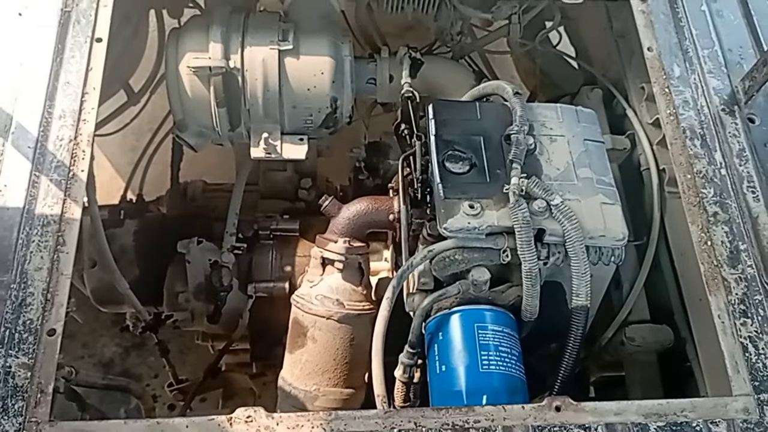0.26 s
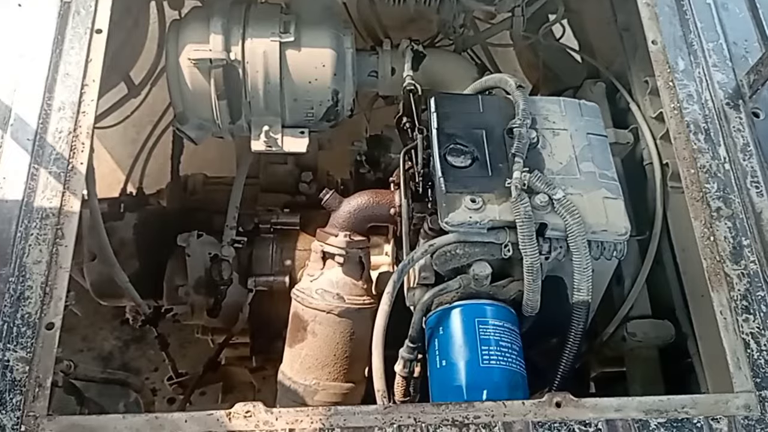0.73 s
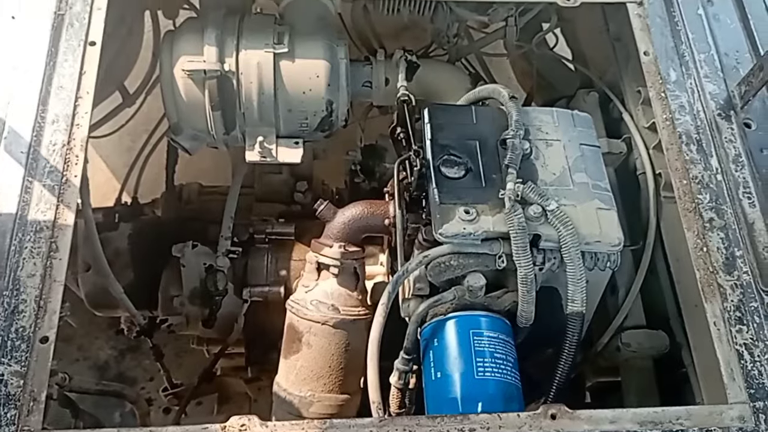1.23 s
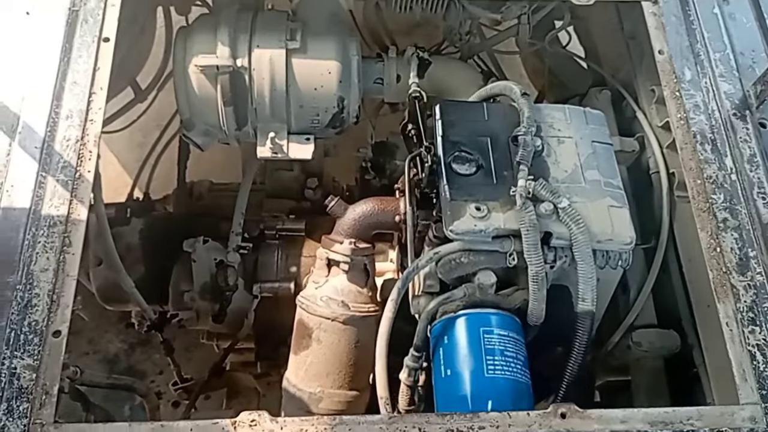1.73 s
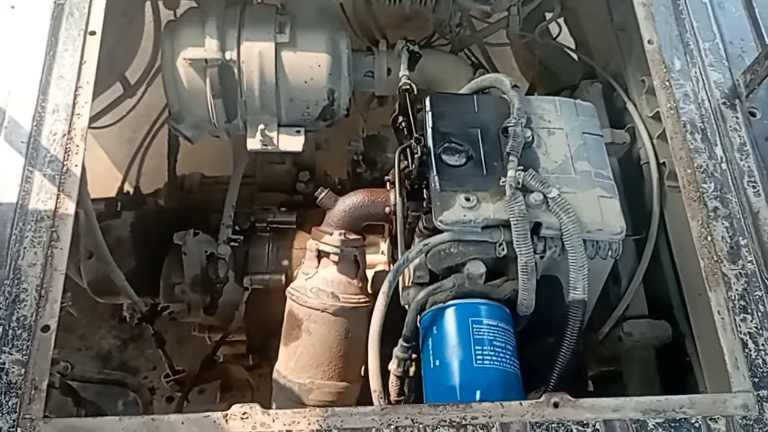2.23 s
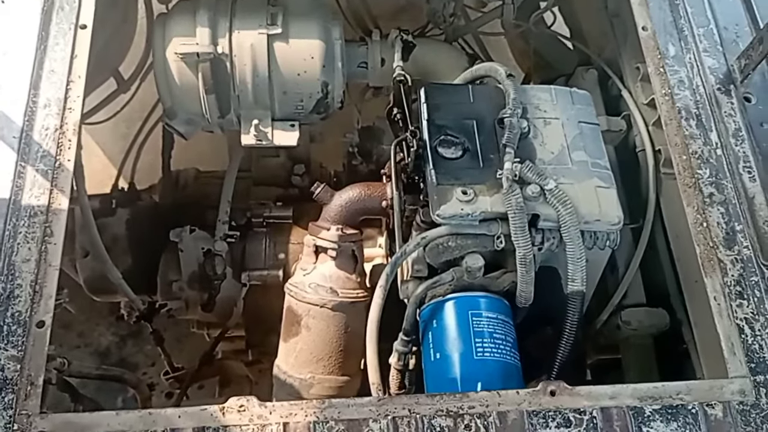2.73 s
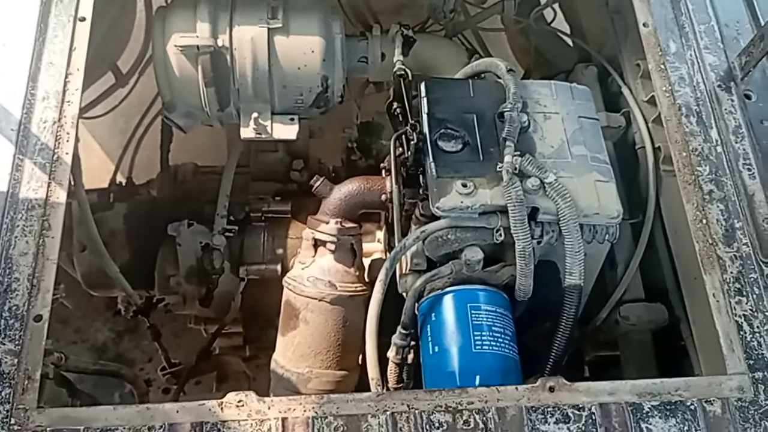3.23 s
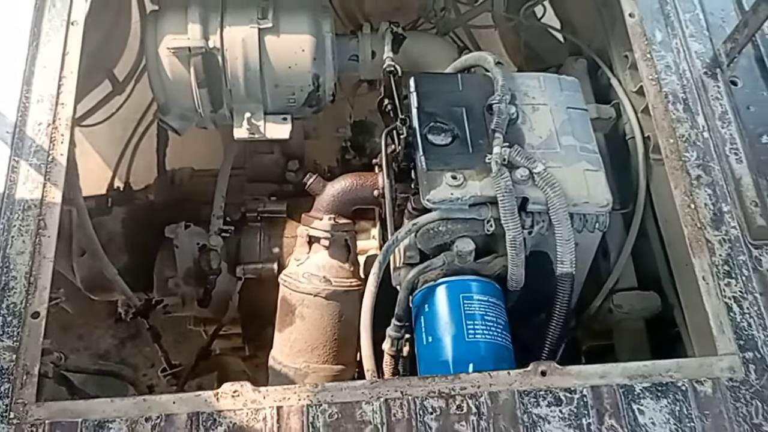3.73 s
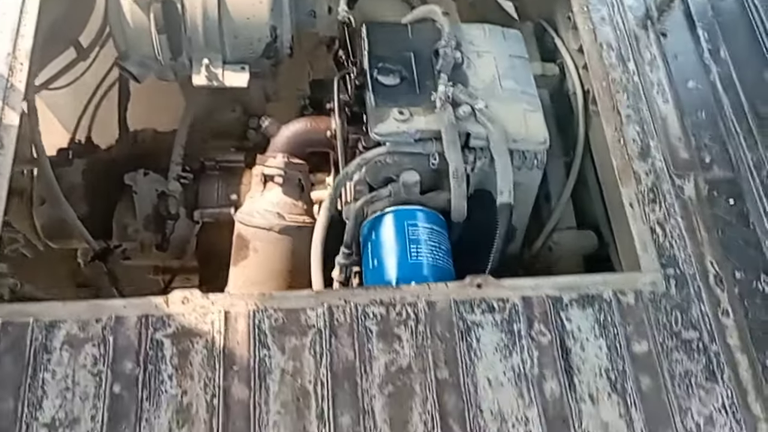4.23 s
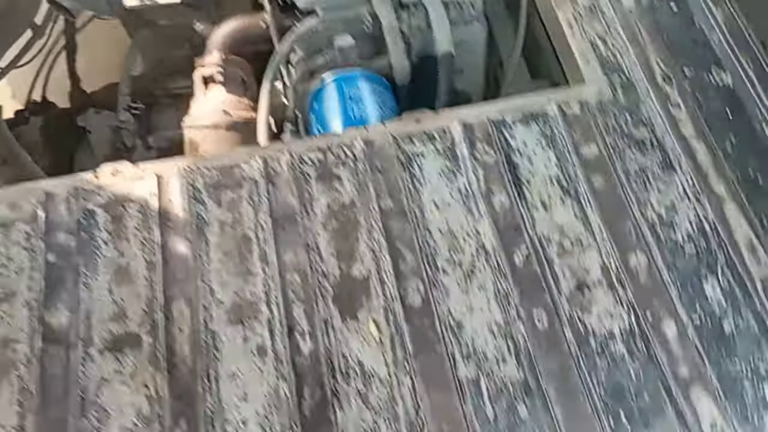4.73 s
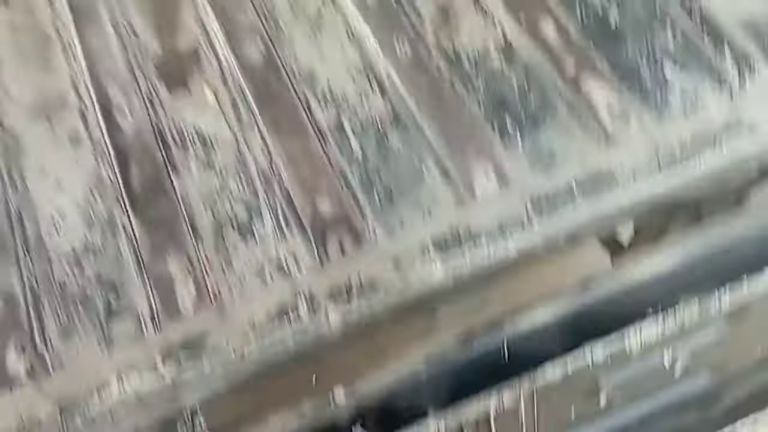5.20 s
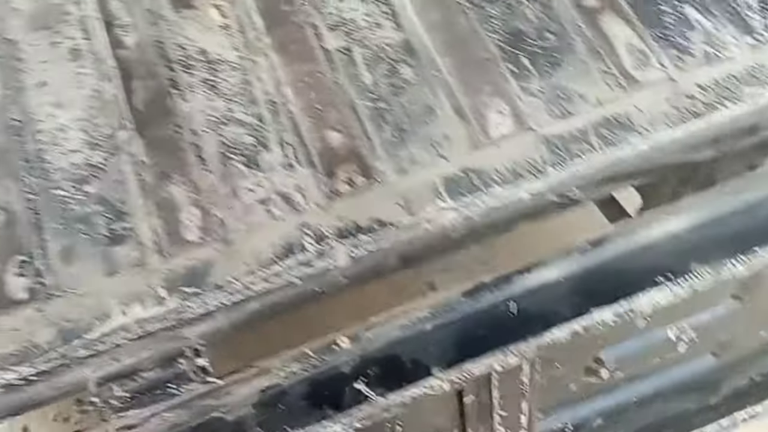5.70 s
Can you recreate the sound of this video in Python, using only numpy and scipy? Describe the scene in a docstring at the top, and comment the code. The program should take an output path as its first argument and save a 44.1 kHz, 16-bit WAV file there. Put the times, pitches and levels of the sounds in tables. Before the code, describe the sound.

Close by an open engine bay outdoors, hissing starter gears give way to uneven thumps, a fast rattling rev and a steady knocking idle.

```python
"""At the open engine hatch of a three-wheeler, its single-cylinder engine starts over a faint outdoor rumble.
The starter hums and whines while its gear teeth, as shaped noise, hiss on the flywheel.
The engine catches, races briefly and settles to idle. Blows in each four-stroke cycle excite filtered noise
or damped resonances: valve clatter, combustion knock, exhaust thump, a second valve and an intake gulp."""
import sys
import numpy as np
from scipy import signal
from scipy.fft import rfft, irfft, next_fast_len
from scipy.io import wavfile
from scipy.ndimage import map_coordinates

SR = 44100
rng = np.random.default_rng(int(sys.argv[2]) if len(sys.argv) > 2 else 0)


def materialize(psi):
    """Save the field psi as 16-bit PCM at rate SR to the path in sys.argv[1].

    A 1-D psi becomes a single channel; in a 2-D psi each row is a channel.
    """
    bounded = np.clip(np.atleast_2d(psi).T, -1, 1)
    quanta = np.round(bounded * 32767).astype(np.int16)
    wavfile.write(sys.argv[1], SR, quanta)


N = 262687
TIME = np.arange(N) / SR  # s


def amp(db):
    """Decibel law: level to amplitude ratio."""
    return 10 ** (np.asarray(db) / 20)


def unit(x):
    """Power normalization: x at rms 1."""
    return x / np.sqrt(np.mean(x ** 2) + 1e-20)


def along(points, hz):
    """Logarithmic frequency scale: (Hz, value) points joined by straight lines on it."""
    f, v = np.transpose(points)
    return np.interp(np.log(hz + 1), np.log(f + 1), v)


def curves(rows, at=TIME):
    """Linear interpolation: each column after the time, read at the given moments."""
    s, *columns = np.transpose(rows)
    return [np.interp(at, s, column) for column in columns]


def wobble(rate):
    """Random modulation: a smooth curve with rate knots a second."""
    knots = rng.standard_normal(int(N * rate / SR) + 4)
    return map_coordinates(knots, [TIME * rate])


def filtered(x, response):
    """Linear filtering: the spectrum of x times a complex response of frequency."""
    m = next_fast_len(N + SR // 2)
    return irfft(rfft(x, m) * response(np.fft.rfftfreq(m, 1 / SR)), m)[..., :N]


def low_pass(hz, corner_hz):
    """Spectral roll-off: gain falls steeply above the corner."""
    return 1 / (1 + (hz / corner_hz) ** 4)


def high_pass(hz, corner_hz):
    """Spectral roll-off: gain falls steeply below the corner."""
    return 1 / (1 + (corner_hz / (hz + 1)) ** 4)


# stereo width of every noise wash: freq_hz [Hz], side_over_mid_db [dB]
STEREO_WIDTH = [(60, -34), (110, -22), (200, -13.5), (380, -9.5), (700, -8), (1290, -1.5), (2380, -2.5),
                (4400, 0.5), (8120, 1), (15000, -0.5)]


def ringing(spectrum, modes=(), width_hz=40, ripple_db=0):
    """Modal superposition: a stereo noise wash of rms 1, a broad spectrum with its modes standing out."""
    def colour(hz):
        """Resonance curves: mode lifts, each held to 7 dB, on a rippled spectrum."""
        lift_db = sum(np.minimum(db, 7) / (1 + (2 * (hz - f) / width_hz) ** 2) for f, db in modes)
        # countless weaker modes ripple the spectrum, differently in mid and side
        knots = np.arange(0, SR / 2, 24)
        ripple = np.array([np.interp(hz, knots, row) for row in rng.uniform(-1, 1, (2, len(knots)))])
        widths = np.array([np.ones_like(hz), amp(along(STEREO_WIDTH, hz))])
        return amp(along(spectrum, hz) + lift_db + ripple_db * ripple) * widths
    mid, side = filtered(rng.standard_normal((2, N)), colour)
    return unit(np.array([mid + side, mid - side]))


def shifting(spectrum, modes, width_hz, ripple_db, rate):
    """Moving contact point: two washes mix so that the fine colour changes about rate times a second."""
    angle = wobble(rate)
    one, other = (ringing(spectrum, modes, width_hz, ripple_db) for _ in range(2))
    return np.cos(angle + np.pi / 4) * one + np.sin(angle + np.pi / 4) * other


def handover(before, after, span):
    """Equal-power crossfade: one sound gives way to another over a span of seconds."""
    share = np.interp(TIME, span, [0, 1])
    return np.sqrt(1 - share) * before + np.sqrt(share) * after


def shaken(blows, rise_s, fall_s):
    """Exponential build-up and decay: amplitude of a part's rattle after each blow."""
    t = np.arange(SR // 4) / SR
    shape = (1 - np.exp(-t / rise_s)) * np.exp(-t / fall_s)
    return np.abs(signal.fftconvolve(blows, shape / shape.max())[:N])


def struck(blows, modes):
    """Impulse response of damped resonances; a unit blow has the energy of a tenth of a second at rms 1."""
    hz = np.fft.rfftfreq(SR // 2, 1 / SR)
    response = sum((-1) ** k * amp(db) * 1j * hz * w / (f * f - hz * hz + 1j * hz * w)
                   for k, (f, w, db) in enumerate(modes))
    ring = irfft(response)
    return signal.fftconvolve(blows, ring / np.linalg.norm(ring) * np.sqrt(SR / 10))[:N]


def blows_at(rows):
    """Impulsive excitation: one impulse for each (s, level dB) row."""
    when, db = np.transpose(rows)
    return np.bincount((when * SR).astype(int), amp(db), N)


# the engine once it has caught: start_s [s], firing_rate [firings per second]
SPEED = [(2.098, 9.29), (2.418, 12.31), (2.716, 16.7), (3.024, 18.43), (3.843, 12.49), (4.376, 11.09),
         (5.64, 9.83), (5.9, 10.12)]
# the slow first firings: start_s [s], strength_db [dB]
FIRST_FIRINGS = [(1.121, -1.5), (1.401, -7), (1.643, 2), (1.819, 1), (1.976, 0.5)]


def cycles():
    """Phase integration of speed: start and length of each cycle, a few slow ones, then one per camshaft turn."""
    caught = TIME[TIME >= SPEED[0][0]]
    turns = np.cumsum(curves(SPEED, caught)[0]) / SR
    steady = np.interp(np.arange(turns[-1]), turns, caught)
    start = np.append(np.transpose(FIRST_FIRINGS)[0], steady)
    return start, np.append(np.diff(start), start[-1] - start[-2])


# open for the start, then eased back: start_s [s], throttle [0-1]
THROTTLE = [(2.2, 0.95), (2.8, 1), (3.1, 1), (3.6, 0.39)]
# the floor comes between engine and microphone: start_s [s], screening [0-1]
SCREENING = [(3.9, 0.09), (5.8, 0.98)]
REFERENCE_RATE = 10  # firings a second


def loudness(law, at=TIME):
    """Source strength law: a part's level in dB from speed, throttle and screening."""
    base_db, speed_db, throttle_db, screened_db, _ = law
    doublings = np.log2(curves(SPEED, at)[0] / REFERENCE_RATE)
    engine_db = base_db + speed_db * doublings + throttle_db * curves(THROTTLE, at)[0]
    return engine_db + screened_db * curves(SCREENING, at)[0]


def beats(law):
    """Cycle-to-cycle variation: start and level in dB of a part's stroke, with the law's random scatter."""
    start = cycles()[0]
    first_db = np.pad(np.transpose(FIRST_FIRINGS)[1], (0, len(start) - len(FIRST_FIRINGS)))
    return start, loudness(law, start) + first_db + law[-1] * rng.standard_normal(len(start))


def strokes(share, db, scatter_s=0):
    """Periodic excitation: one impulse in each engine cycle, at a share of its length."""
    start, length = cycles()
    when = start + share * length + scatter_s * rng.standard_normal(len(start))
    samples = np.maximum(when * SR, 0).astype(int)
    return np.bincount(samples, amp(db) * np.ones(len(start)), N)[:N]


def cluster(share, db, spread_s, fall_s, count):
    """Energy summation: a few hard clicks follow each stroke, each at its own moment and strength."""
    length = cycles()[1]
    power = 0
    for _ in range(count):
        delay = rng.exponential(spread_s, len(db)) / length
        power = power + strokes(share + delay, db + rng.uniform(-3, 2, len(db))) ** 2
    return np.sqrt(shaken(power, rise_s=0.0002, fall_s=fall_s / 2))  # halved: power falls twice as fast


def running():
    """Gradual onset: fades the engine's steady churn in as it catches."""
    return np.interp(TIME, [1.1, 2.05], [0, 1]) ** 2


# firings that hit harder or softer: start_s [s], knock_lift_db [dB], valve_lift_db [dB]
ACCENTS = [(2.1, 1, 4.5), (2.2, 1, -1), (2.29, -1, -1.5), (2.38, -3, 1), (2.46, 1.5, 0.5), (2.535, -2, 0),
           (2.61, 1, .5), (2.73, -.5, 0), (2.79, 1.5, 2), (3.13, -0.5, -1.5), (3.19, 0, -2),
           (3.3, -0.5, 0.5), (3.49, -2.5, .5), (3.55, 0, 1), (4.02, 1, -0.5), (4.1, 2, 0), (4.19, 0.5, -.5),
           (4.36, 0.5, -0.5), (4.64, 0.5, .5), (4.82, 1, 0.5), (4.92, -0.5, 1), (5.01, 0, 0.5),
           (5.11, -0.5, 0), (5.21, -2, 0.5), (5.3, 2, -0.5), (5.4, 0, -0.5), (5.5, -.5, 0.5),
           (5.6, 1.5, -1), (5.81, 1.5, 1), (5.9, 1.5, 2)]


def accents(start):
    """Uneven excitation: lift in dB of the knock and of the valves in each cycle."""
    s, *lifts = np.transpose(ACCENTS)
    return np.array(lifts) @ (np.abs(start - s[:, None]) < 0.025)


# faint outdoor rumble: freq_hz [Hz], density_db [dB per Hz, relative]
AIR = [(20, -4), (60, -5), (130, 0), (300, -3), (1000, -16), (5000, -32), (15000, -38)]


def outdoor_rumble():
    """Broadband ambience: steady noise weighted towards the bass."""
    return amp(-49) * ringing(AIR)


# the body shaken through the engine mounts: freq_hz [Hz], density_db [dB per Hz, relative]
MOUNTS = [(25, -29), (50, -9), (75, 4.5), (125, -11), (170, 3), (240, -6), (320, 6.5), (450, -17),
          (1200, -75)]
# gas flow and lurches, before each stroke's trim: base_db [dB at the reference rate, throttle 0],
# speed_db [dB per doubling], throttle_db [dB at full], screened_db [dB], scatter_db [dB per cycle]
PIPE_LAW = (-32.5, 0.5, 5, 0, 0)


def lurches():
    """Vibration transmission: the first uneven firings heave the engine on its mounts and shake the body."""
    start, db = beats(PIPE_LAW)
    uneven_db = np.interp(start, [1.2, 1.8, 1.97, 2.12, 2.22, 2.31, 2.55, 2.8], [-7, -2, 2, 1, 0, 2, -3, -44])
    heave = shaken(strokes(0.25, db + uneven_db - 0.5), rise_s=0.011, fall_s=0.065)
    return heave * ringing(MOUNTS)


# where strokes fall in the cycle: start_s [s], then shares of the cycle [0-1]:
# knock_share, exhaust_share, second_valve_share, crankcase_thud_share
TIMING = [(2.1, 0.12, 0.48, 0.51, 0.3), (2.5, 0.13, 0.36, 0.63, .25), (3.0, 0.077, 0.344, 0.6, 0.012),
          (3.6, 0.12, 0.43, 0.71, .16), (4.3, 0.15, 0.452, .74, .22), (5.9, 0.2, 0.45, 0.69, .19)]
# turbulent boom of the silencer: freq_hz [Hz], density_db [dB per Hz, relative]
PIPE = [(16, -49), (28, -35), (86, 3.5), (184, 3.5), (210, 9.5), (270, -41), (460, -120)]
# resonances rung by an exhaust pulse: freq_hz [Hz], width_hz [Hz], level_db [dB, relative]
EXHAUST = [(85.5, 30, -2), (138, 65, -4), (206, 59, -9.5)]
# resonances rung by an intake gulp: freq_hz [Hz], width_hz [Hz], level_db [dB, relative]
INTAKE = [(86, 31, 8), (132.7, 12, 6.5), (173, 49, -0.5)]


def pipes():
    """Pulsating gas flow: an exhaust thump and a softer intake gulp each cycle, over turbulent boom."""
    start, db = beats(PIPE_LAW)
    exhaust_share = curves(TIMING, start)[1]
    slow_db = np.interp(start, [1.9, 2.4], [-8, 0])  # a slow piston moves the gas gently
    load_db = np.interp(start, [3.6, 4.2], [1.5, 0])  # favours the exhaust until idle
    exhaust_db = db + slow_db + load_db - 3.5
    intake_db = db + 2 * slow_db - load_db - 5.5
    exhaust = struck(strokes(exhaust_share, exhaust_db, scatter_s=0.00035), EXHAUST)
    intake = struck(strokes(exhaust_share + 0.356, intake_db, scatter_s=0.00037), INTAKE)
    flow = np.interp(TIME, [1.2, 2.6, 2.9], [0, 0.4, 1])
    boom = flow * amp(loudness(PIPE_LAW) - 3 - 5 * curves(THROTTLE)[0]) * ringing(PIPE)
    # the silencer rounds the pulses off and passes little of their lowest part
    muffled = filtered(exhaust + intake, lambda hz: low_pass(hz, 300) * high_pass(hz, 45))
    return boom + muffled


# panel level, before each stroke's trim: base_db [dB at the reference rate, throttle 0],
# speed_db [dB per doubling], throttle_db [dB at full], screened_db [dB], scatter_db [dB per cycle]
PANEL_LAW = (-27.5, 5, 6.5, -0.6, 0.3)
# drumming, thud and bark over time: start_s [s], bay_force_db [dB], thud_db [dB], bark_db [dB]
DRUMMING = [(2.2, -12, -13, -14), (2.6, -5, -11, -13), (2.85, -.5, -7.5, -10), (3.15, -.5, -10.5, -9),
            (3.5, -4, -10, -8), (4.0, -6.5, -12, -9), (5.0, -3, -14, -12.5)]
# blows with which each cycle drums on the bay: cycle_share [share of the cycle], level_db [dB]
BAY_BLOWS = [(-0.03, -11.5), (0.11, -15), (0.28, -13), (0.42, -14.5)]
# sheet metal of the bay: freq_hz [Hz], width_hz [Hz], level_db [dB, relative]
BAY = [(96, 20, -5), (140, 30, -2.5), (183, 22, 0), (290, 22, 2.5), (340, 55, -3), (424, 55, -1.5),
       (490, 60, -7.5), (585, 70, -9), (668, 50, -12.5)]
# crankcase resonances: freq_hz [Hz], width_hz [Hz], level_db [dB, relative]
CRANKCASE = [(187, 13, -6), (291, 11, 0), (380, 70, -7)]
# valve cover resonances: freq_hz [Hz], width_hz [Hz], level_db [dB, relative]
COVER = [(290, 38, -7), (342, 50, -3.5), (410, 60, -4)]
# sheet metal under throttle: freq_hz [Hz], density_db [dB per Hz, relative]
RACING_PANELS = [(100, -28), (170, -1), (188, -3), (225, -8.5), (254, -10), (275, 4), (291, 5), (317, -2),
                 (424, -1), (455, 1), (521, -9), (565, -22), (620, -4.5), (810, -13), (1360, -120)]
# sheet metal at idle: freq_hz [Hz], density_db [dB per Hz, relative]
IDLE_PANELS = [(100, -38), (170, 2.5), (210, -11), (235, -3), (280, -1.5), (300, -5), (324, -9), (351, -5),
               (424, -3), (470, -14), (507, -5), (547, -16), (620, -12.5), (810, -15), (1360, -120)]


def panels():
    """Structure-borne sound: crankcase thud and valve-cover bark, with the bay's sheet metal drumming along."""
    start, db = beats(PANEL_LAW)
    _, _, second_share, thud_share = curves(TIMING, start)
    force_db, thud_db, bark_db = curves(DRUMMING, start)

    def blow(share, level_db):
        """Impulsive force: one slightly uneven blow a cycle."""
        return strokes(share, level_db + rng.normal(0, 1, len(db)), scatter_s=0.00015)

    thud = struck(blow(thud_share, db + thud_db), CRANKCASE)
    bark = struck(blow(second_share - 0.07, db + bark_db), COVER)
    drum = struck(sum(blow(share, db + force_db + level_db) for share, level_db in BAY_BLOWS), BAY)
    direct = drum + filtered(thud + bark, lambda hz: 1 / (1 + 1j * hz / 800) ** 2)
    # the bay's side wall answers 4.27 ms later, opposite in the two channels
    wall = amp(-13) * filtered(direct, lambda hz: np.exp(-2j * np.pi * hz * 0.00427))
    sheet = handover(ringing(RACING_PANELS), ringing(IDLE_PANELS), [3.3, 4.2])
    throb = shaken(strokes(0.04, db - 10.0), rise_s=0.0065, fall_s=0.024)  # the power stroke shakes the sheets
    churn = running() * amp(loudness(PANEL_LAW) - 4.5)
    rumble = np.hypot(churn, throb) * amp(-8 * curves(THROTTLE)[0])
    return rumble * sheet + np.array([direct + wall, direct - wall])


# the engine begins to overrun the starter, then the pinion drops out
OVERRUN_S, OVERRUN_RISE_S, RELEASE_S, RELEASE_DB_PER_S = 1.378, 0.028, 1.934, 178


def meshed(levels, fall_db_per_s):
    """Load-dependent excitation: level in dB, steady, stepping up when overrun, ringing out on release."""
    cranking_db, more_db = levels
    overrun = np.clip((TIME - OVERRUN_S) / OVERRUN_RISE_S, 0, 1)
    return cranking_db + more_db * overrun - fall_db_per_s * np.maximum(TIME - RELEASE_S, 0)


# the starter motor's hum, before its trim and wobble: start_s [s], level_db [dB]
HUM = [(0.0, -30.5), (0.22, -30.5), (0.288, -41.5), (0.458, -33), (0.518, -53), (0.614, -23), (0.676, -40),
       (0.7, -54), (0.784, -29), (1.198, -30.5), (1.244, -57), (1.274, -32), (1.402, -27), (1.5, -57)]
HUM_HZ, HUM_TRIM_DB = 188.3, 0.8  # centre of a wavering pitch
# the first firings jolt the frame: start_s [s], level_db [dB before filtering]
JOLTS = [(1.186, -39), (1.235, -35), (1.51, -35), (1.553, -36), (1.578, -32), (1.722, -41), (1.862, -35),
         (1.886, -35), (2.009, -30), (2.048, -30), (2.328, -33)]
# what a jolt rings: freq_hz [Hz], width_hz [Hz], level_db [dB, relative]
FRAME_MODES = [(78.4, 22, -1.5), (130, 21, 1), (172, 33, 0), (302, 50, -11)]
# frame shudder: freq_hz [Hz], density_db [dB per Hz, relative]
FRAME = [(30, -30), (60, -8.5), (100, -7), (130, 7), (165, 3.5), (210, 5.5), (300, -38), (600, -70)]


def starter_hum():
    """Tonal motor noise: a wavering sine until the engine outruns it; the frame shudders and is jolted."""
    phase = 2 * np.pi * np.cumsum(HUM_HZ * (1 + 0.016 * wobble(25))) / SR
    loaded = np.interp(TIME, [1.43, 1.55], [1, 0])
    hum_db = curves(HUM)[0] + HUM_TRIM_DB + wobble(24.0)
    hum = loaded * amp(hum_db) * np.sqrt(2) * np.sin(phase)
    jolts = filtered(struck(blows_at(JOLTS), FRAME_MODES), lambda hz: low_pass(hz, 500) * high_pass(hz, 40))
    shudder_db = meshed((-42.5, 7), RELEASE_DB_PER_S) + 3.2 * wobble(17.54)
    return hum + jolts + amp(shudder_db) * ringing(FRAME)


# partials of the starter's gearing: hum_multiple [ratio], level_db [dB before wobble]
WHINE = [(2.33, -39), (5.2, -37.5), (5.6, -39), (7.4, -43), (8.4, -42)]


def starter_whine():
    """Gear-mesh tones: partials at multiples of the hum's centre pitch waver together, each in its own level."""
    turns = np.cumsum(HUM_HZ * (1 + 0.025 * wobble(14))) / SR
    loaded = np.interp(TIME, [1.36, 1.45], [1, 0])

    def partial(multiple):
        """Modulated sine: level and phase wander."""
        return amp(4 * wobble(18)) * np.sin(2 * np.pi * multiple * turns + wobble(40))

    channels = [sum(amp(db) * partial(multiple) for multiple, db in WHINE) for _ in range(2)]
    return loaded * np.array(channels)


# the teeth bind and grind harder: start_s [s, centre of the snag], length_s [s], lift_db [dB]
SNAGS = [(0.015, 0.05, 3), (0.1, 0.035, 2.5), (0.18, 0.04, 4), (0.31, 0.05, 3.3), (0.39, 0.05, 2.3),
         (0.505, 0.04, 2.2), (0.602, 0.05, 5.8), (0.68, 0.05, 1.5), (0.765, 0.05, 2), (0.86, 0.055, 5),
         (0.945, 0.04, 2.6), (1.02, 0.03, 2.2), (1.13, 0.04, 2.2), (1.2, 0.05, 2.8), (1.3, 0.04, 2),
         (1.48, 0.09, 3.3), (1.7, 0.1, 3), (1.78, 0.04, 1.5), (1.858, 0.045, 3.3), (1.925, 0.05, 2.3)]
# hiss of the gear teeth: freq_hz [Hz], density_db [dB per Hz, relative]
GEAR = [(5000, -65), (6400, -10), (7250, -9), (7500, 2), (8100, 0), (8800, 3), (9400, -2), (10300, -3),
        (11500, -10.5), (13500, -15), (15500, -25)]
# gear resonances: freq_hz [Hz], lift_db [dB]
GEAR_MODES = [(3924, 4), (4134, 7), (4285, 3), (4860, 7), (5085, 4), (6799, 4), (7160, 3), (7504, 7),
              (7623, 4), (7790, 3), (7887, 3), (8085, 3), (8367, 3), (8452, 3), (8634, 4), (8797, 3),
              (8872, 3), (8965, 3), (9505, 3), (10115, 3), (10265, 3)]
# scrape of the teeth: freq_hz [Hz], density_db [dB per Hz, relative]
SCRAPE = [(1470, -60), (2500, -1), (3300, 4.5), (3700, 1.5), (4150, 6.5), (4520, 4.5), (5090, 6), (5400, 7),
          (5800, 3), (6450, 6), (7500, 4), (9750, -45), (16500, -120)]
# starter housing under load: freq_hz [Hz], density_db [dB per Hz, relative]
CRANKING = [(140, -59), (230, -12), (257, -21), (280, -11), (313, -6.5), (431, -1), (531, -12.5),
            (707, -3.5), (863, -10), (974, -5.5), (1190, -9), (1400, -8.5), (1750, -9.5), (2040, -7.5),
            (3200, -15.5), (4160, -13.5), (7040, -120)]
# housing resonances under load: freq_hz [Hz], lift_db [dB]
HOUSING_MODES = [(290, 2), (431, 2), (668, 2), (980, 3), (1324, 3.9), (1389, 5), (1593, 4), (1895, 3.5),
                 (2003, 3), (2110, 3)]
# starter housing overrun by the engine: freq_hz [Hz], density_db [dB per Hz, relative]
OVERRUN = [(140, -28), (230, -11), (334, -1.5), (395, -6.5), (455, -2.5), (525, -12), (700, -2.5),
           (892, -5.5), (974, -2), (1160, -8.5), (1370, -3), (1770, -12), (1930, -5.5), (2430, -13.5),
           (3200, -11), (4160, -40), (7040, -120)]
# housing resonances when overrun: freq_hz [Hz], lift_db [dB]
OVERRUN_MODES = [(715, 3), (1330, 4.5), (1440, 1.5)]
# the pinion's backlash slams shut as the engine kicks ahead: start_s [s], level_db [dB before rasp]
CLASHES = [(1.19, -27), (1.412, -18.5), (1.545, -25), (1.598, -22), (1.652, -15), (1.812, -21)]
# the freed pinion's ring: freq_hz [Hz], density_db [dB per Hz, relative]
PINION = [(5000, -9), (7500, -14), (8800, -7), (9300, -5), (9500, 2), (9750, -6), (10400, -9), (11200, -11),
          (13000, -16), (15500, -28)]
# dB while cranking, dB more when overrun, before snags and chatter
GEAR_DB, SCRAPE_DB, HOUSING_DB = (-17, 6), (-27, 9), (-21, 1.34)
SCRAPE_SNAG = 0.4  # lift of the scrape per dB of gear lift
COAST_DB, COAST_HOLD_S, COAST_DB_PER_S = -26, 0.22, 33  # the freed pinion spinning down


def starter():
    """Rough gear contact: pinion teeth grind on the ring gear and rattle the housing until release."""
    snag_db = sum(db * np.exp(-(2 * (TIME - s) / length) ** 2) for s, length, db in SNAGS)
    chatter = wobble(220)  # teeth land with uneven force
    gear_db = meshed(GEAR_DB, RELEASE_DB_PER_S) + snag_db + 0.87 * chatter + 0.6 * wobble(60)
    scrape_db = meshed(SCRAPE_DB, RELEASE_DB_PER_S) + SCRAPE_SNAG * snag_db + chatter + 0.7 * wobble(60)
    gear = amp(gear_db) * ringing(GEAR, GEAR_MODES, width_hz=23, ripple_db=1.5)
    scrape = amp(scrape_db) * ringing(SCRAPE, GEAR_MODES, width_hz=55, ripple_db=4)
    cranking = shifting(CRANKING, HOUSING_MODES, width_hz=28, ripple_db=8, rate=22)
    # the firing engine now drives the pinion: a harsher growl
    overrun = shifting(OVERRUN, OVERRUN_MODES, width_hz=47, ripple_db=7, rate=20)
    rasp_db = chatter + np.interp(TIME, [1.35, 1.5], [1.1, 1.7]) * wobble(130)
    clashes = shaken(blows_at(CLASHES), rise_s=0.0055, fall_s=0.019)
    rattle = np.hypot(amp(meshed(HOUSING_DB, fall_db_per_s=80)), clashes) * amp(rasp_db)
    housing = rattle * handover(cranking, overrun, [1.35, 1.55])
    free_s = TIME - RELEASE_S
    coast_db = COAST_DB - COAST_DB_PER_S * np.maximum(free_s - COAST_HOLD_S, 0)
    coasting = np.clip(free_s / 0.018 + 1, 0, 1) * amp(coast_db)
    return gear + scrape + housing + coasting * ringing(PINION, ripple_db=5)


# valve level, before each stroke's trim: base_db [dB at the reference rate, throttle 0],
# speed_db [dB per doubling], throttle_db [dB at full], screened_db [dB], scatter_db [dB per cycle]
VALVE_LAW = (-26, -2.5, 3, -5.5, 0.5)
# valve clatter: freq_hz [Hz], density_db [dB per Hz, relative]
VALVES = [(2180, -10), (3700, -4), (5270, -9), (6230, -5.5), (7190, -6.5), (9530, -2.5), (15500, -18)]
# valve resonances: freq_hz [Hz], lift_db [dB]
VALVE_MODES = [(3499, 2), (3790, 2), (4600, -2), (5028, -2), (6245, 1.5), (8064, 3), (9500, 2.5), (9970, 2),
               (10271, 2)]


def valve_gear():
    """Impact noise: two bright bursts of clatter a cycle, over the churn of the timing gears."""
    start, db = beats(VALVE_LAW)
    gentle_db = np.interp(start, [2.2, 2.55], [-4, 0])  # slow cams seat the valves softly
    db = db + accents(start)[1] + gentle_db
    second_share = curves(TIMING, start)[2]
    first = shaken(strokes(-0.05, db + 0.5), rise_s=0.0099, fall_s=0.023)
    taps = cluster(0.01, db - 2, spread_s=0.008, fall_s=0.0025, count=3)
    second = shaken(strokes(second_share - 0.075, db - 5.5), rise_s=0.003, fall_s=0.016)
    churn = running() * amp(loudness(VALVE_LAW) - 12.5 + 5.5 * curves(THROTTLE)[0])
    grain = amp(0.44 * wobble(500))
    steel = ringing(VALVES, VALVE_MODES, width_hz=59, ripple_db=4.0)
    # the second valve closes more lightly and keeps only the brightest part
    second_steel = ringing(VALVES, VALVE_MODES, width_hz=52, ripple_db=4)
    bright = unit(filtered(second_steel, lambda hz: high_pass(hz, 7000)))
    return grain * (np.sqrt(first ** 2 + taps ** 2 + churn ** 2) * steel + second * bright)


# knock level, before each stroke's trim: base_db [dB at the reference rate, throttle 0],
# speed_db [dB per doubling], throttle_db [dB at full], screened_db [dB], scatter_db [dB per cycle]
KNOCK_LAW = (-27, 0.35, 5, -4, -0.6)
# the block under throttle: freq_hz [Hz], density_db [dB per Hz, relative]
RACING_KNOCK = [(290, -31), (480, -4), (580, -3.5), (661, -0.5), (889, -8), (1020, -3), (1150, -8),
                (1550, -8.5), (1770, -9), (1900, -7.5), (2130, -11), (2310, -9.5), (2860, -15),
                (4000, -17.5), (4600, -20.5), (5980, -36), (10100, -120)]
# block resonances under throttle: freq_hz [Hz], lift_db [dB, held to 7]
RACING_MODES = [(668, 3), (1001, 6), (1507, -2), (1593, 6.5), (1916, 5), (2340, 6), (2659, 7.5), (3219, 7),
                (3488, 5.5), (4037, 5), (4264, 5)]
# the block at idle: freq_hz [Hz], density_db [dB per Hz, relative]
IDLE_KNOCK = [(290, -30), (500, -20), (655, -5.5), (705, -9), (800, -9), (846, -4), (890, -16), (1000, -5),
              (1170, -11.5), (1320, -11), (1450, -11), (1640, -11), (2400, -11), (2900, -18), (3600, -20.5),
              (4300, -25), (5590, -30), (9460, -120)]
# block resonances at idle: freq_hz [Hz], lift_db [dB, held to 7]
IDLE_MODES = [(770, 4.5), (846, 5.5), (960, 3.5), (1505, 4), (1643, 2), (1927, 4), (2048, 3), (2333, 3.5),
              (2670, 9), (3262, 7), (3661, 1), (3779, -2), (4102, 9)]
# a loose shield rung by each idle knock: freq_hz [Hz], width_hz [Hz], level_db [dB, relative]
SHIELD = [(846, 12, 0), (1046, 25, -17)]


def combustion():
    """Pressure-jump excitation: injection's knock rings the block, in other modes at idle than when racing."""
    start, db = beats(KNOCK_LAW)
    db = db + accents(start)[0]
    knock_share = curves(TIMING, start)[0]
    throttle = curves(THROTTLE)[0]
    knock = shaken(strokes(knock_share, db - 0.4), rise_s=0.0051, fall_s=0.021)
    cracks = cluster(knock_share + 0.03, db - 2.4, spread_s=0.012, fall_s=0.0016, count=5)
    # the piston slaps the bore on its way down
    slap_db = db - 4.5 + rng.normal(0, 1.0, len(db))
    slap = shaken(strokes(knock_share + 0.16, slap_db, scatter_s=0.003), rise_s=0.0012, fall_s=0.022)
    churn = running() * amp(loudness(KNOCK_LAW) - 11.5 + 5 * throttle)
    grain = amp((0.8 + 0.6 * throttle) * wobble(300))
    racing = shifting(RACING_KNOCK, RACING_MODES, width_hz=36, ripple_db=7, rate=16)
    idling = shifting(IDLE_KNOCK, IDLE_MODES, width_hz=30, ripple_db=7, rate=8)
    force = np.sqrt(knock ** 2 + cracks ** 2 + slap ** 2 + churn ** 2)
    block = force * grain * handover(racing, idling, [3.4, 4.1])
    # the treble flickers, so the knock turns brighter and duller
    treble = filtered(block, lambda hz: high_pass(hz, 1500))
    block = block + treble * (amp(0.9 * wobble(14)) - 1)
    loose = np.interp(TIME, [3.6, 4.2], [0, 1])
    shield_db = db - 19.5 + rng.normal(0, 1.0, len(db))
    shield = struck(strokes(knock_share + 0.06, shield_db, scatter_s=0.00026), SHIELD)
    return block + loose * shield


# the microphone turns away from the hatch: start_s [s], left_over_right_db [dB], left_lead_ms [ms]
PAN = [(0, 0.6, 0.062), (1.3, -0.7, 0.049), (2.3, .4, 0.067), (3.3, 0.7, 0.086), (4.3, 0.5, .12),
       (5.2, 1.1, 0.29), (5.9, 1.4, 0.27)]


def turned(bay):
    """Interchannel level and time difference: places the engine bay, drifting slightly to the left."""
    pan_db, lead_ms = curves(PAN)
    lead = lead_ms * SR / 1000  # samples
    heard = []
    for side, sign in zip(bay, (1, -1)):
        moved = map_coordinates(side, [np.arange(N) + sign * lead / 2], order=3)
        heard.append(amp(sign * pan_db / 2) * moved)
    return np.array(heard)


def scene():
    """Superposition: the engine bay's sources over a faint outdoor rumble."""
    bay = lurches() + pipes() + panels() + starter_hum() + starter_whine() + starter() + valve_gear() + combustion()
    return outdoor_rumble() + turned(bay)


def record(dry):
    """Saturation and band limiting: the microphone rounds off high peaks and keeps nothing above 15600 Hz."""
    held = dry / (1 + np.abs(dry) ** 8) ** (1 / 8)
    return filtered(held, lambda hz: hz < 15600)


dry = scene()
out = record(dry)
materialize(out)
```